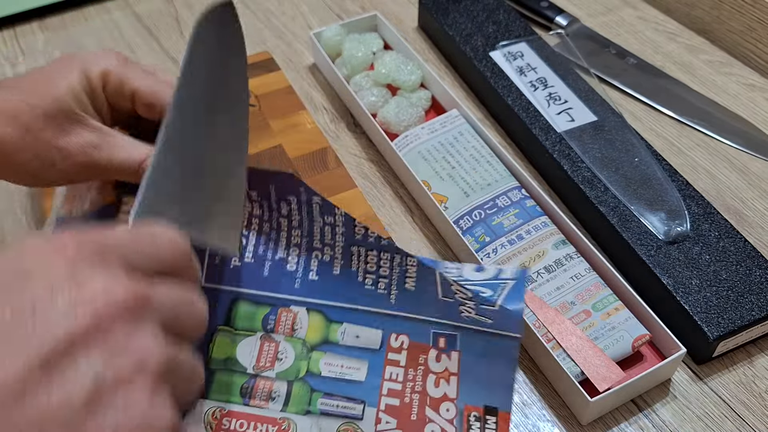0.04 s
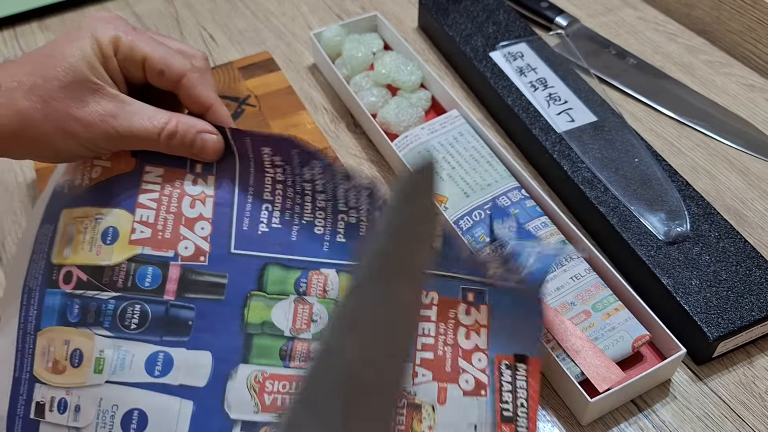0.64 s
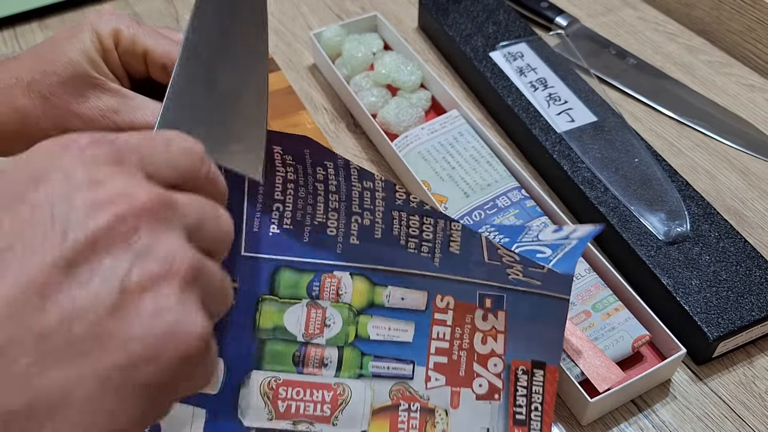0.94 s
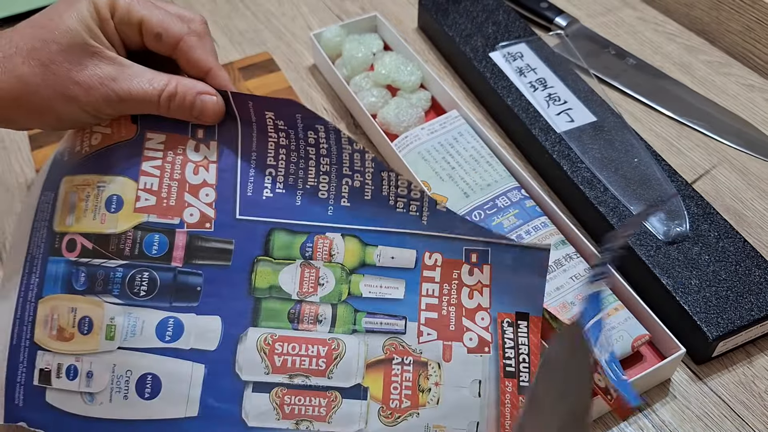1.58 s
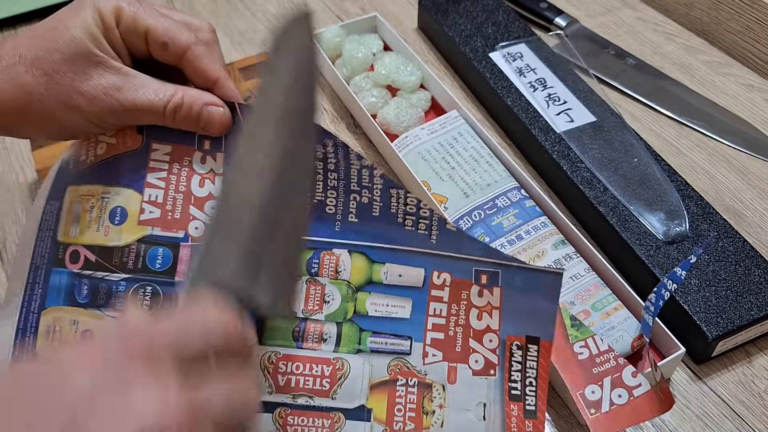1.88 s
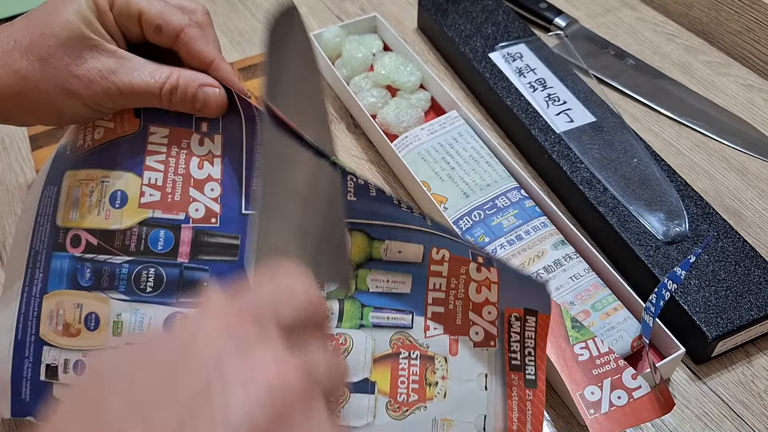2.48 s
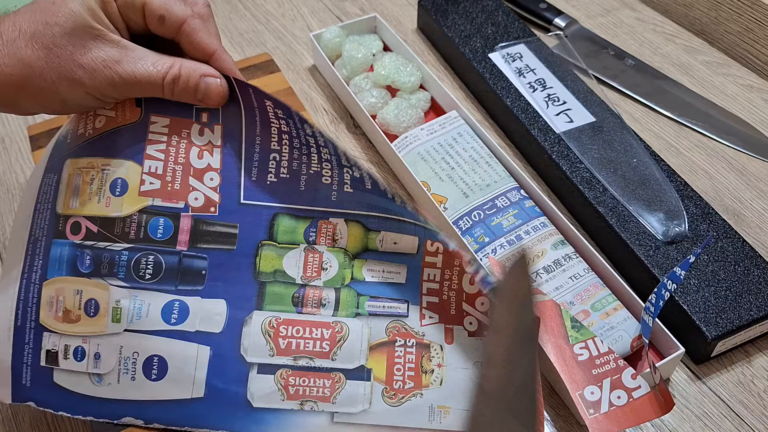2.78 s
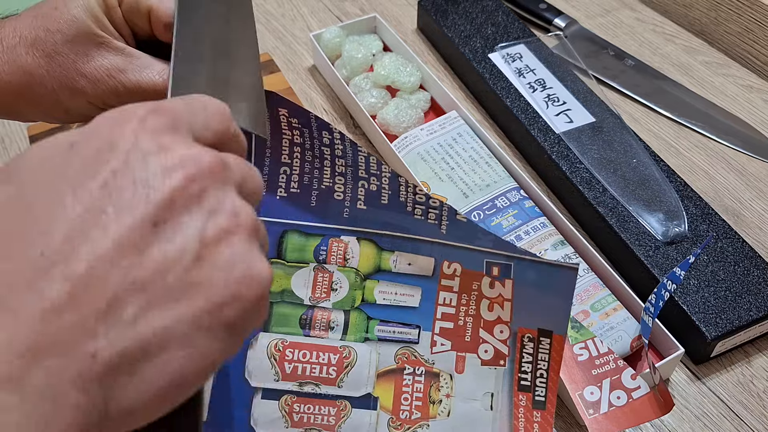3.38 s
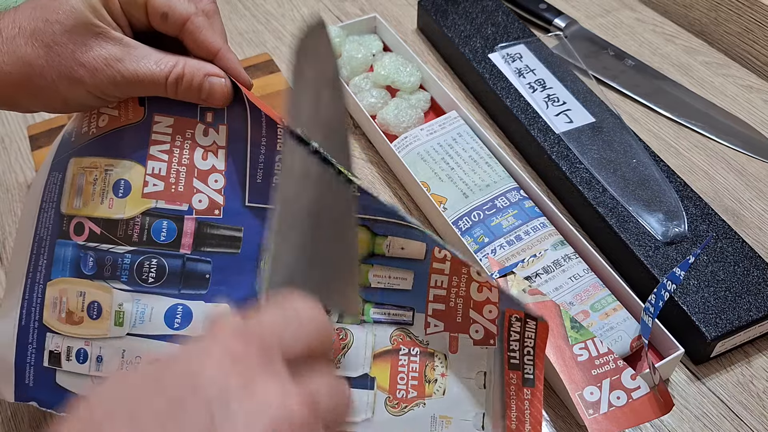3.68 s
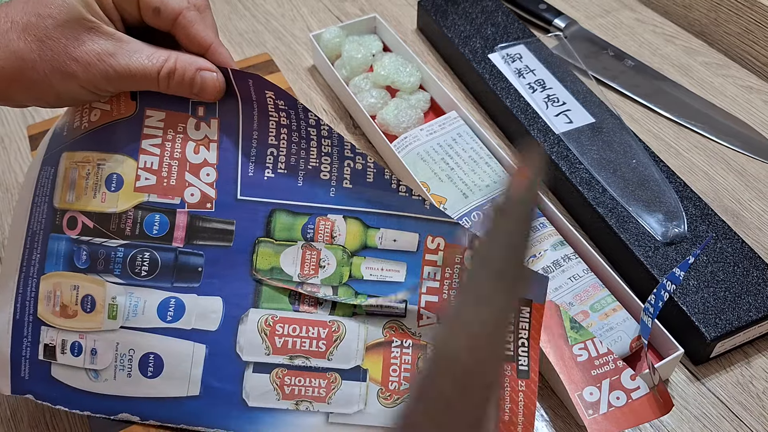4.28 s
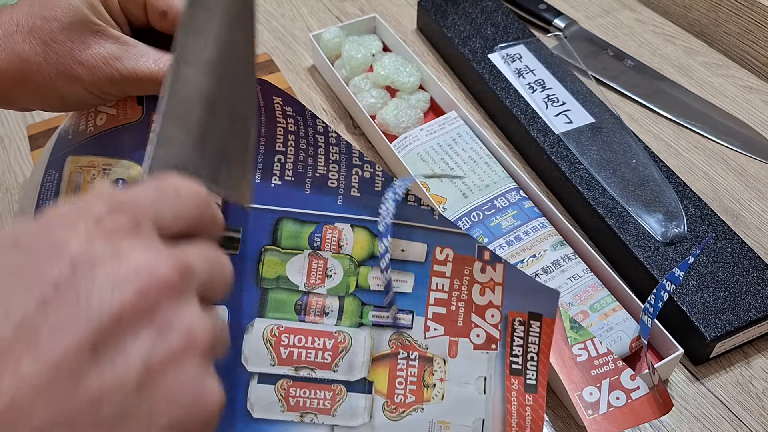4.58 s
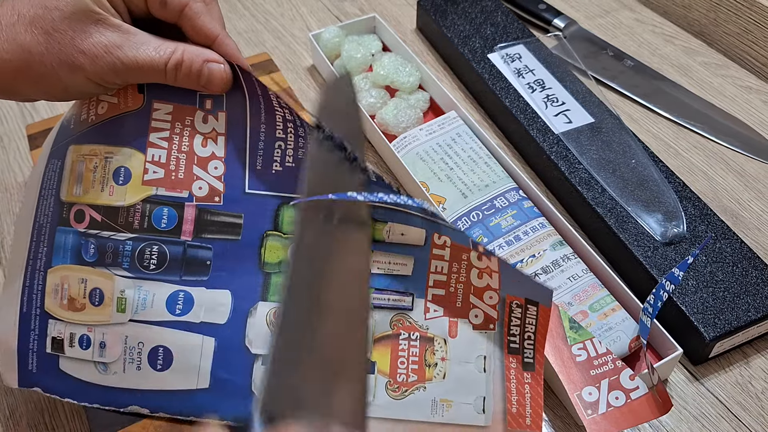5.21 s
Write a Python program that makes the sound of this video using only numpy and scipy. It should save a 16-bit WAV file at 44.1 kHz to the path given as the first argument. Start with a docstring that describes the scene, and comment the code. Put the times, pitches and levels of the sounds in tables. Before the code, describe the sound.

Five quick, papery hisses as a kitchen knife cuts strips from a held sheet, which slides and crinkles softly in a small room.

```python
"""Knife slicing glossy paper

A sharp kitchen knife cuts five strips off a sheet held over a wooden table in a small room.
Each cut is a dense run of snapping fibres that rings the sheet and, falling in pitch, the strip.
Between cuts the blade slides on the paper; the sheet rustles, flaps and crinkles over a faint hum."""
import sys
import numpy as np
from scipy import signal
from scipy.fft import rfft, irfft
from scipy.io import wavfile

SR = 44100
rng = np.random.default_rng(int(sys.argv[2]) if len(sys.argv) > 2 else 0)


def store_pcm(level_fs):
    """Save levels as 16-bit WAV."""
    pcm = np.round(np.clip(level_fs, -1, 1) * 32767).astype(np.int16)
    wavfile.write(sys.argv[1], SR, np.atleast_2d(pcm).T)


N = 231339
TIME = np.arange(N) / SR


def cutting(modes_db=-7, tug_s=0.066, strip_short_hz=4200, strip_long_hz=3000, strip_growth_db=17):
    """Fibres snap as the blade gathers speed; the last let go with a tug. Returns hiss, narrow rings."""
    # knife strokes: start/s, end/s, level/dB, entry drop/dB, run-up/s, treble/dB, bass/dB, tug/dB,
    # strip ring/dB; treble, bass and ring re mid-band hiss
    cuts = [(0.37, 0.496, -35.5, -1.5, 0.045, 0, -21, 0, -5.5),
            (1.172, 1.517, -34.5, 2.5, 0.1, 3.5, -21, 6, -0.5),
            (2.317, 2.681, -35, 9.5, 0.078, 0, -17.5, -2.5, 2),
            (3.496, 4.045, -34.5, 5.5, 0.058, 0.1, -15.5, 3, -4.5),
            (4.932, 5.35, -34.5, 4, 0.1, 2, -17.5, 0.5, -16)]
    # fibre hiss spectrum: f/Hz, level/dB
    fibre_colour = [(88, -48), (150, -16.5), (515, -12.5), (728, -9.5), (1000, -8.5), (2100, -3),
                    (2600, -3.5), (5200, -2), (6300, -6), (7790, -4.5), (9630, -9), (15000, -3)]
    # taut paper sings under the blade: centre/s, half-length/s, f/Hz, gain/dB
    rasps = [(1.21, 0.068, 4610, -2), (1.39, 0.094, 1860, -3.5), (2.46, 0.062, 1710, -11),
             (3.63, 0.06, 1140, -10), (3.94, 0.039, 2090, -8.5), (4.97, 0.018, 1540, -3.5)]
    # thin zing where the edge bites hardest: centre/s, half-length/s, f/Hz, gain/dB
    zings = [(0.475, 0.04, 7200, -4), (1.37, 0.047, 7500, 1.5), (2.65, 0.054, 7400, 2.5),
             (3.81, 0.052, 7500, -3.5), (4.015, 0.076, 8000, -0.5), (5.21, 0.15, 7400, -4.5)]
    cuts = np.array(cuts)
    current_cut = cuts[np.searchsorted(cuts[1:, 0], TIME)]
    start_s, end_s, db, entry_db, run_up_s, treble_db, bass_db, tug_db, strip_db = current_cut.T
    age_s, length_s = np.maximum(TIME - start_s, 0), end_s - start_s
    progress = np.minimum(age_s / length_s, 1)
    slowness = np.exp(-age_s / run_up_s)
    tug = np.exp(-(np.maximum(length_s - age_s, 0) / tug_s) ** 2)
    stroke_db = db - entry_db * slowness + tug_db * tug
    gain = contact(start_s, length_s, stroke_db, attack_s=0.0059, sag_db_per_s=0, release_s=0.003)
    sides = np.array([[1], [-1]])
    gain = gain * from_db((progress - 0.5) / 2 * sides)  # slight travel, right to left

    fibres = snaps(per_s=11000, spread_db=2.5, clump_db=0.55, clumps_per_s=340)
    sheet = colour(fibres + from_db(modes_db) * sheet_modes(fibres), fibre_colour)
    treble = from_db(treble_db - 12.5 * slowness)  # a slow blade is duller and heavier
    bass = from_db(bass_db + 8 * slowness + 3 * tug)
    hiss = rebalance(sheet, treble, bass, low_hz=1412, high_hz=9000)

    drive = butter(fibres, 800, "high")
    # the lengthening strip rings lower and louder
    strip_hz = strip_short_hz * (strip_long_hz / strip_short_hz) ** progress
    strip_gain = from_db(strip_db - strip_growth_db * (1 - progress) + 2 * tug)
    strip = strip_gain * resonance(drive, strip_hz, q=3.9)
    rasp_hz, rasp_gain = swells(rasps, sag_octaves_per_s=3.4)
    rasp = rasp_gain * resonance(drive, rasp_hz, q=6.5)
    zing_hz, zing_gain = swells(zings)
    zing = zing_gain * resonance(rng.standard_normal((2, N)), zing_hz, q=10)
    return gain * hiss, gain * (strip + rasp + zing * from_db(3 * sides))


def sheet_modes(x, low_hz=1300, high_hz=14000, count=8, wander=0.19, swell_db=4, changes_per_s=11):
    """Resonances of the bent sheet wander, swell and fade as its shape changes."""
    modes = 0
    for k, rest_hz in enumerate(np.geomspace(low_hz, high_hz, count)):
        gain = from_db(swell_db * drift(changes_per_s)) * (-1) ** k * np.sqrt(rest_hz)
        hz = np.minimum(rest_hz * np.exp(wander * drift(changes_per_s)), 0.45 * SR)
        modes = modes + gain * resonance(x, hz, q=9)
    return rms_one(modes)


def crinkles(trim_db=-6, first_snap_db=15, ring_width=1.24):
    """Each buckle is a short crack with a broad ring of the sheet."""
    # sheet buckles, flaps or tears free: t/s, relative level/dB, ring f/Hz, decay/s, crack re ring/dB
    buckles = [(0.0772, -19, 4400, 0.00024, -37), (0.097, -33, 1980, 0.0078, -11),
               (0.127, -27, 3230, 0.00068, 2), (0.398, -32.5, 302, 0.0048, -25),
               (0.478, -18.5, 3480, 0.00078, -3), (0.848, -24.5, 2240, 0.0012, -10),
               (1.49, -19.5, 2760, 0.03, -9), (1.512, -36.5, 300, 0.011, -10.5),
               (1.723, -38.5, 12000, 0.00094, 4), (1.7843, -37.5, 12000, 0.00045, -3.5),
               (1.954, -19.5, 1215, 0.0043, 18), (1.992, -33, 4700, 0.0059, -0.5),
               (2.453, -32.5, 895, 0.014, -4), (4.464, -41, 8900, 0.0014, -17),
               (4.555, -41, 1900, 0.013, 17.5)]
    grains = snaps(per_s=35000, spread_db=3.0, clump_db=-5.5, clumps_per_s=300)
    out = np.zeros((2, N))
    for start_s, db, hz, decay_s, crack_db in buckles:
        age_s = TIME - start_s
        burst = grains * (age_s >= 0) * np.exp(-np.minimum(np.abs(age_s) / decay_s, 20))
        burst[:, round(start_s * SR)] += from_db(first_snap_db)  # one large fracture leads
        ring = butter(burst, [hz / ring_width, hz * ring_width], "band", order=1)
        ring *= burst.std() / ring.std()
        crack = butter(butter(burst, 520, "high", order=1), 4200, "low", order=1)
        crack_gain = from_db(crack_db)
        out += from_db(db + trim_db) * (ring + crack_gain * crack) / np.hypot(1, crack_gain)
    return out


def sliding(trim_db=-1):
    """Glossy paper slips over the flat of the blade: fine, bright grains."""
    # slides: start/s, length/s, relative level/dB
    slides = [(0.0, 0.065, -50.5), (0.212, 0.19, -63), (0.494, 0.16, -42.5), (0.686, 0.17, -56),
              (1.106, 0.042, -60), (1.78, 0.15, -53), (2.148, 0.27, -70), (2.673, 0.1, -40.5),
              (2.798, 0.11, -43.5), (2.946, 0.27, -62.5), (4.46, 0.09, -66), (4.55, 0.21, -58),
              (4.822, 0.17, -63)]
    # friction spectrum: f/Hz, level/dB
    slide_colour = [(300, -29), (1000, -11), (2000, -3.5), (3000, -1.5), (4500, 0), (7500, -2),
                    (9200, -5.5), (12500, -1.5), (16000, -2.5)]
    gain = sum(contact(*slide, attack_s=0.01, sag_db_per_s=16.5, release_s=0.021) for slide in slides)
    grains = snaps(per_s=11000, spread_db=1.0, clump_db=1.05, clumps_per_s=240)
    return from_db(trim_db) * gain * rms_one(colour(grains, slide_colour))


def flexing(trim_db=-1):
    """The bending sheet crackles: sparse, duller grains."""
    # bends: start/s, length/s, relative level/dB
    flexes = [(0.0, 0.028, -50), (0.078, 0.086, -45.5), (0.713, 0.058, -48.5), (0.802, 0.058, -52),
              (1.948, 0.05, -51), (2.903, 0.13, -65), (3.192, 0.051, -69), (4.556, 0.23, -64)]
    # rustle spectrum: f/Hz, level/dB
    flex_colour = [(150, -16), (500, -4), (1200, -2), (2000, 2), (4000, -8.5), (8000, -23), (16000, -7.5)]
    gain = sum(contact(*flex, attack_s=0.0075, sag_db_per_s=34, release_s=0.012) for flex in flexes)
    grains = snaps(per_s=770, spread_db=3.0, clump_db=3.0, clumps_per_s=95)
    return from_db(trim_db) * gain * rms_one(colour(grains, flex_colour))


def flapping(trim_db=-2):
    """Each wave of the sheet or arm pushes a soft rumble of air at the microphone."""
    # waves: start/s, length/s, relative level/dB, high-pass f/Hz
    flaps = [(0.0, 0.73, -61, 22), (0.72, 0.96, -58, 32.15), (1.945, 0.1, -66, 35.9),
             (2.349, 0.27, -65.5, 36), (2.66, 0.27, -64, 35), (3.5, 0.71, -61.5, 45),
             (4.055, 0.473, -58.5, 65.5), (4.965, 0.34, -62.5, 40)]
    # rumble spectrum: f/Hz, level/dB
    flap_colour = [(26, -30), (42, 2), (56, -11.5), (72, 1), (100, -7.5), (200, -17.5), (500, -43.5)]
    rumble, out = air(flap_colour), 0
    for start_s, length_s, db, low_hz in flaps:
        gain = contact(start_s, length_s, db, attack_s=0.016, sag_db_per_s=4.5, release_s=0.061)
        out = out + gain * rms_one(butter(rumble, low_hz, "high"))
    return from_db(trim_db) * out


def tabletop(x, echo_gain=0.3, nearest_s=0.0005, farthest_s=0.005, sway=0.14, count=8):
    """Adds short echoes off table, boxes and hands; the paths shift as the hands move."""
    out = x.copy()
    for channel, bright in zip(out, butter(x, 1900, "high", order=1)):
        for k, path_s in enumerate(rng.uniform(nearest_s, farthest_s, count)):
            lag = np.round(path_s * (1 + sway * drift(6)) * SR).astype(int)
            channel += (-1) ** k * echo_gain * bright[np.clip(np.arange(N) - lag, 0, N - 1)]
    return out / np.sqrt(1 + count * echo_gain ** 2)


def room(x, apart_hz=700, wet_db=-6, build_s=0.01):
    """Diffuse tail, dying band by band."""
    # reverberation time: f/Hz, T60/s
    room_t60 = [(200, 0.76), (1000, 0.36), (4000, 0.43), (14000, 0.37)]
    age_s, tail = TIME[:SR * 3 // 4], 0
    edges_hz = np.geomspace(120, 18000, 8)
    for low_hz, high_hz in zip(edges_hz, edges_hz[1:]):
        alike = 1 / (1 + (high_hz / apart_hz) ** 2)  # long waves reach both channels together
        shared, own = rng.standard_normal(len(age_s)), rng.standard_normal((2, len(age_s)))
        band = butter(np.sqrt(alike) * shared + np.sqrt(1 - alike) * own, [low_hz, high_hz], "band")
        tail = tail + band * from_db(-60 * age_s / at_hz(room_t60, np.sqrt(low_hz * high_hz)))
    tail = rms_one(tail * (1 - np.exp(-age_s / build_s))) / np.sqrt(len(age_s))
    return from_db(wet_db) * signal.fftconvolve(x, tail, axes=1)[:, :N]


def room_hum():
    """Two faint tones with wavering phase."""
    # hum tones: f/Hz, rms level/dB
    tones = [(144, -77), (343, -79)]
    return sum(from_db(db) * np.sqrt(2) * np.sin(2 * np.pi * hz * TIME + drift(12)) for hz, db in tones)


def air(spectrum, apart_hz=700, apart_db=-11):
    """Stereo noise, alike in the bass, unrelated in the treble."""
    shared, own = rng.standard_normal(N), rng.standard_normal((2, N))
    noise = butter(shared, apart_hz, "low") + butter(own, apart_hz, "high") + from_db(apart_db) * own
    return rms_one(colour(noise, spectrum))


def snaps(per_s, spread_db, clump_db, clumps_per_s, apart_hz=2000):
    """Tiny fractures of uneven size, bunched as the paper catches and lets go."""
    sizes = from_db(spread_db * np.minimum(rng.exponential(1, N), 4))
    sizes *= rng.random(N) < per_s / SR
    sizes *= from_db(clump_db * drift(clumps_per_s))
    # long waves reach both channels alike; short ones leave the bent sheet with a sign for each
    shared, own = sizes * rng.choice([-1, 1], N), sizes * rng.choice([-1, 1], (2, N))
    return rms_one(butter(shared, apart_hz, "low", order=1) + butter(own, apart_hz, "high", order=1))


def contact(start_s, length_s, db, attack_s, sag_db_per_s, release_s):
    """Gain of one touch: attack, sag, release."""
    age_s = np.maximum(TIME - start_s, 0)
    attack = 1 - np.exp(-age_s / attack_s)
    release = np.exp(-np.maximum(age_s - length_s, 0) / release_s)
    return from_db(db - sag_db_per_s * np.minimum(age_s, length_s)) * attack * release


def swells(rows, sag_octaves_per_s=0):
    """Pitch and bell-shaped gain of the nearest of several brief resonances."""
    rows = np.array(rows)
    borders_s = (rows[1:, 0] + rows[:-1, 0]) / 2
    centre_s, half_s, hz, db = rows[np.searchsorted(borders_s, TIME)].T
    offset_s = np.clip(TIME - centre_s, -3 * half_s, 3 * half_s)
    return hz * 2 ** (-sag_octaves_per_s * offset_s), from_db(db) * np.exp(-(offset_s / half_s) ** 2)


def resonance(x, hz, q, block=128):
    """Stereo band-pass tracking hz; white noise keeps its power."""
    out, state = np.zeros((2, N)), np.zeros((2, 2))
    for i in range(0, N, block):
        angle = 2 * np.pi * hz[i] / SR
        radius = np.exp(-angle / (2 * q))
        b = np.sqrt((1 - radius ** 2) / 2) * np.array([1, 0, -1])
        a = [1, -2 * radius * np.cos(angle), radius ** 2]
        out[:, i:i + block], state = signal.lfilter(b, a, x[:, i:i + block], zi=state)
    return out


def rebalance(x, treble, bass, low_hz, high_hz):
    """Weight treble and bass against a unit-power mid band."""
    low = signal.sosfiltfilt(signal.butter(2, low_hz, "low", fs=SR, output="sos"), x)
    high = signal.sosfiltfilt(signal.butter(2, high_hz, "high", fs=SR, output="sos"), x)
    return rms_one(x - low - high) + treble * rms_one(high) + bass * rms_one(low)


def colour(x, spectrum, size=16384):
    """Minimum-phase filter from (f/Hz, level/dB) points."""
    cepstrum = irfft(np.log(from_db(at_hz(spectrum, np.fft.rfftfreq(size, 1 / SR)))))
    cepstrum[1:size // 2] *= 2
    cepstrum[size // 2 + 1:] = 0
    impulse = irfft(np.exp(rfft(cepstrum)))
    return np.apply_along_axis(signal.fftconvolve, -1, x, impulse)[..., :N]


def butter(x, hz, kind, order=2):
    """Butterworth filter."""
    sos = signal.butter(order, np.minimum(hz, SR / 2 - 1), kind, fs=SR, output="sos")
    return signal.sosfilt(sos, x + 1e-18)


def drift(per_s):
    """Random wander, unit rms."""
    knots = rng.standard_normal(N // 8)
    return rms_one(np.interp(TIME * per_s, np.arange(len(knots)), knots))


def at_hz(points, hz):
    """Interpolate over log frequency."""
    points_hz, values = np.transpose(points)
    return np.interp(np.log(hz + 1), np.log(points_hz), values)


def from_db(db):
    """Decibels to gain."""
    return 10 ** (np.asarray(db) / 20)


def rms_one(x):
    """Scale to unit power."""
    return x / np.sqrt(np.mean(x ** 2) + 1e-20)


def scene(room_tone_db=-70.0, ring_send_db=-9):
    """Paper sounds in the room, over stirred air and a quiet background."""
    # background noise spectrum: f/Hz, level/dB
    room_tone = [(28, -29.5), (45, 6), (120, -7), (200, -7.5), (450, -6.5), (700, -24), (1500, -27.5),
                 (6000, -24.5), (16000, -33.5)]
    hiss, rings = cutting()
    paper = hiss + sliding() + flexing() + crinkles()
    # the sheet beams its narrow rings forward, so little of them fills the room
    reverb = room(paper + from_db(ring_send_db) * rings)
    hum = room_hum()
    return tabletop(paper + rings) + reverb + flapping() + hum + from_db(room_tone_db) * air(room_tone)


def record(dry, right_lag_samples=4, cutoff_hz=16000):
    """Two microphone ports, each with its own colour; the right lags, the top is cut."""
    # port imbalance: f/Hz, left minus right/dB
    ports = [(300, 6.5), (1500, 5.5), (3000, -1), (5000, -2.5), (7800, 2.5), (10000, -7), (12500, -16),
             (16000, -1)]
    left = colour(dry[0], [(hz, db / 2) for hz, db in ports])
    right = colour(dry[1], [(hz, -db / 2) for hz, db in ports])
    right = np.pad(right, (right_lag_samples, 0))[:N]
    return signal.sosfilt(signal.ellip(10, 0.1, 80, cutoff_hz, fs=SR, output="sos"), [left, right])


dry = scene()
out = record(dry)
store_pcm(out)
```